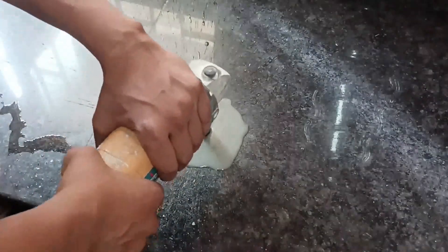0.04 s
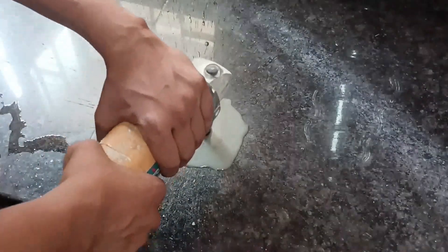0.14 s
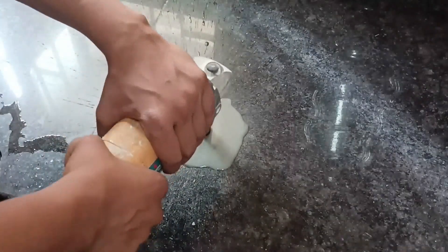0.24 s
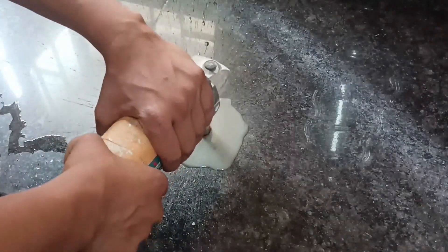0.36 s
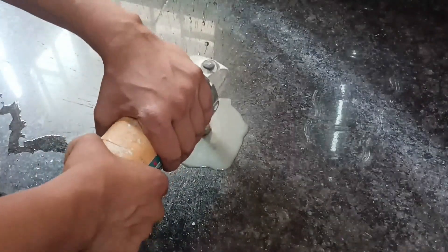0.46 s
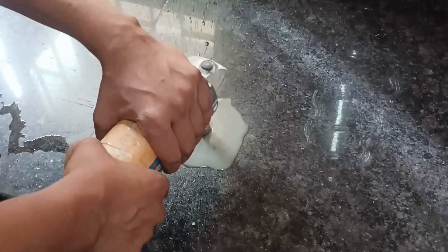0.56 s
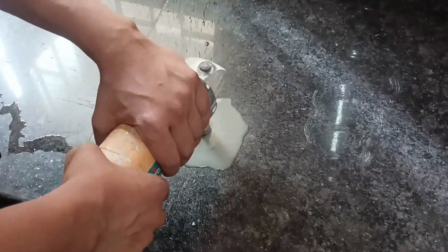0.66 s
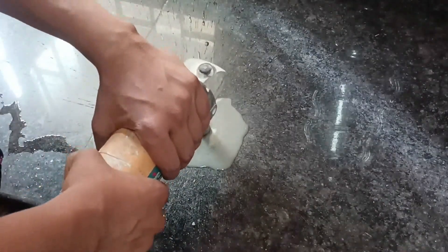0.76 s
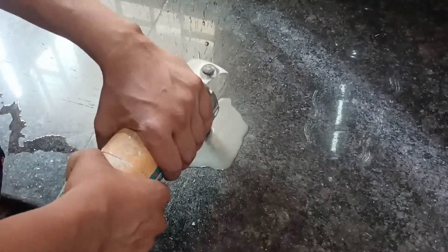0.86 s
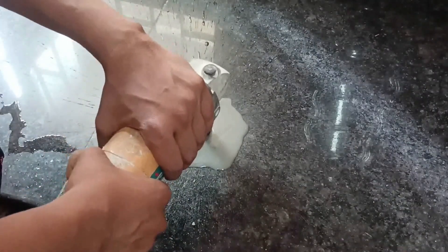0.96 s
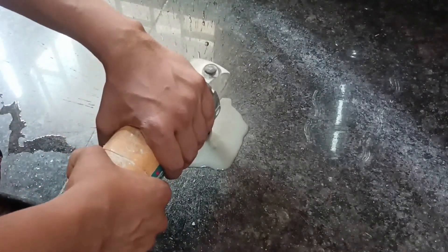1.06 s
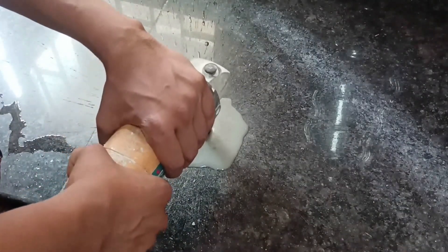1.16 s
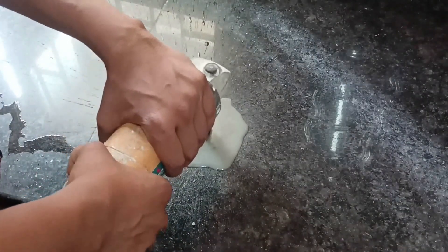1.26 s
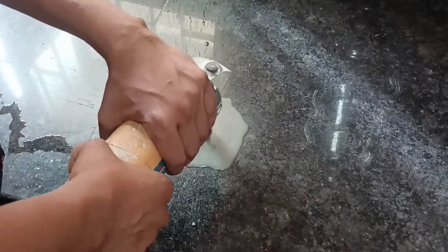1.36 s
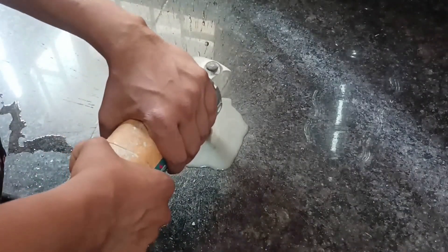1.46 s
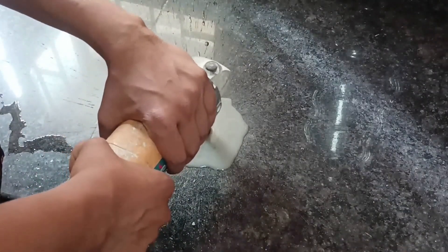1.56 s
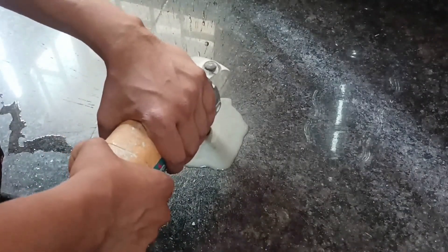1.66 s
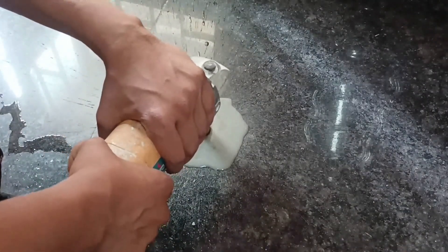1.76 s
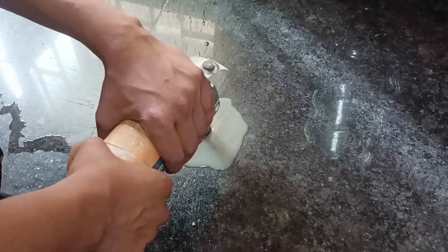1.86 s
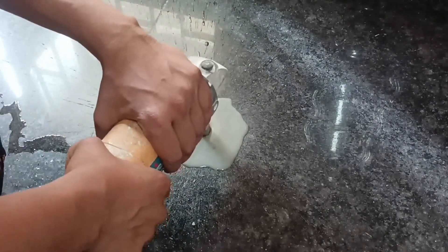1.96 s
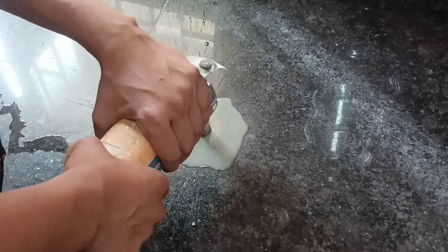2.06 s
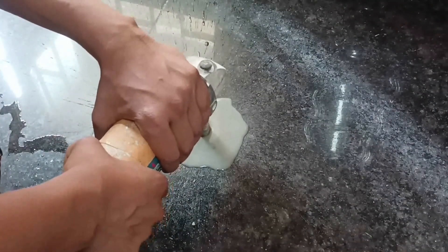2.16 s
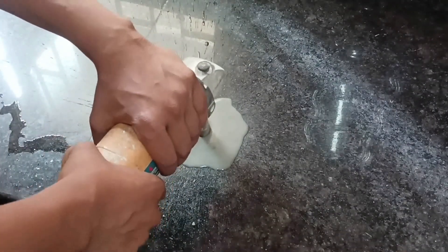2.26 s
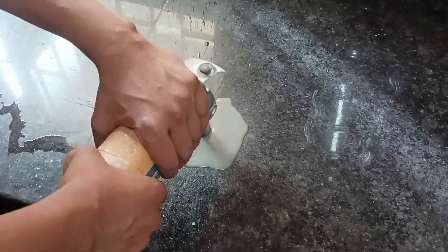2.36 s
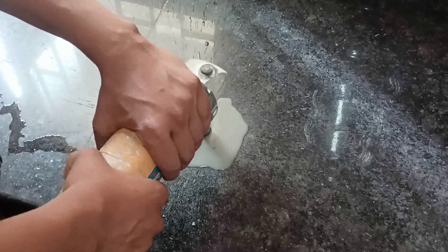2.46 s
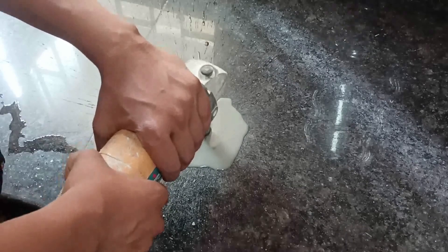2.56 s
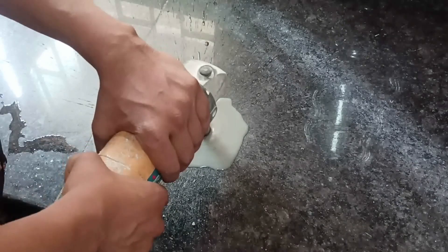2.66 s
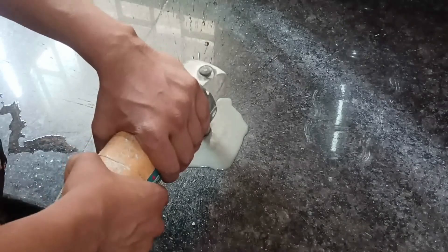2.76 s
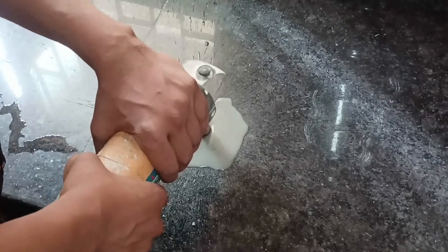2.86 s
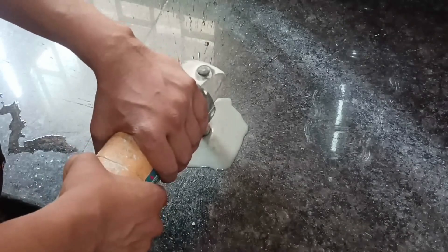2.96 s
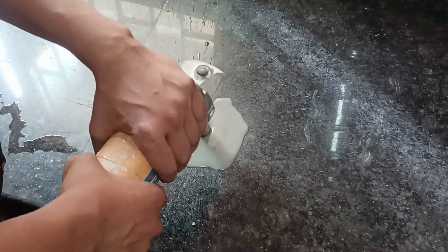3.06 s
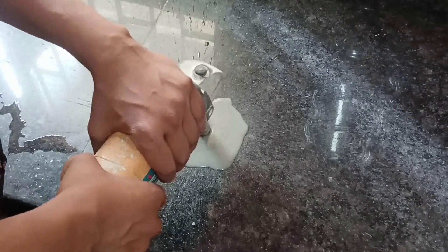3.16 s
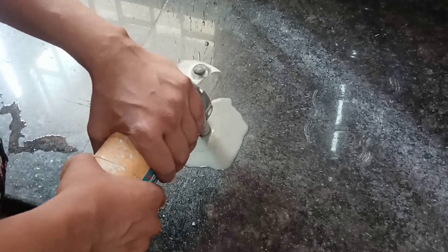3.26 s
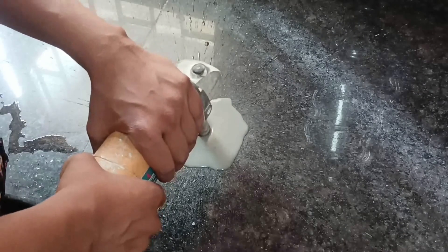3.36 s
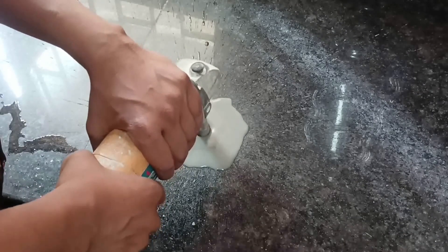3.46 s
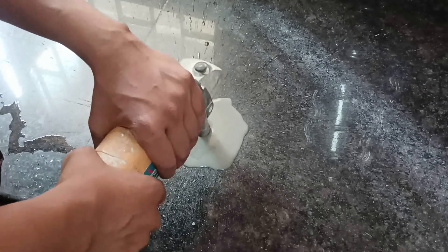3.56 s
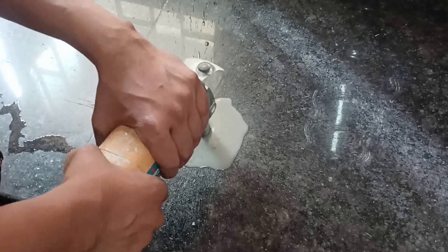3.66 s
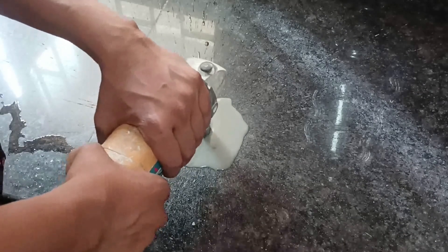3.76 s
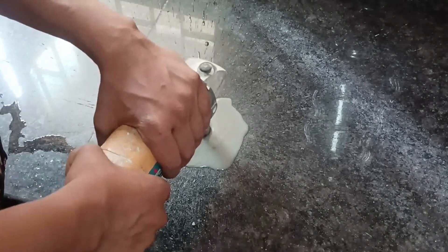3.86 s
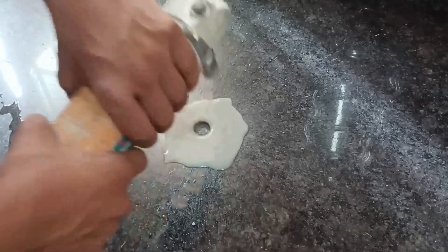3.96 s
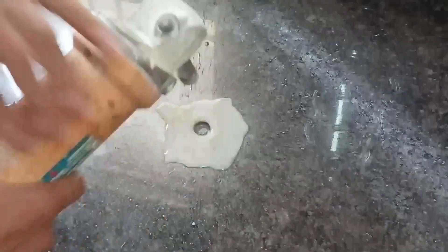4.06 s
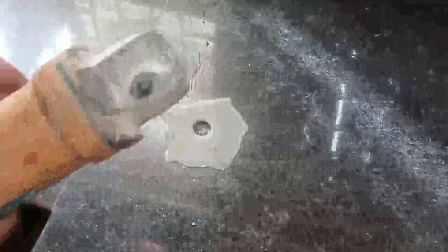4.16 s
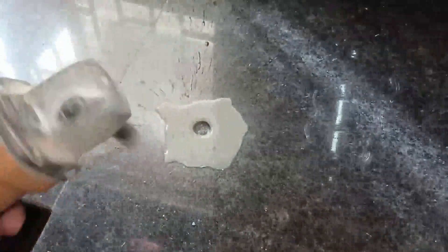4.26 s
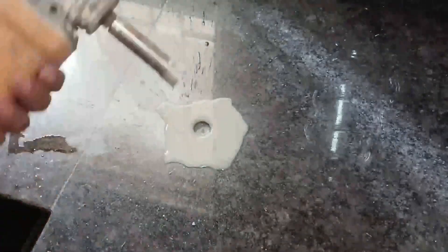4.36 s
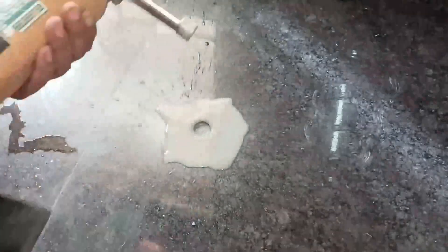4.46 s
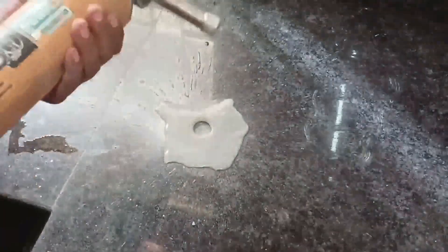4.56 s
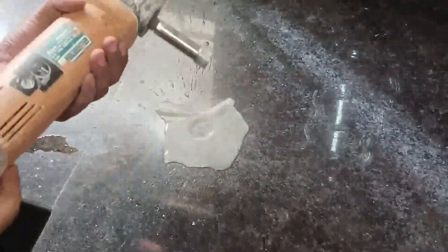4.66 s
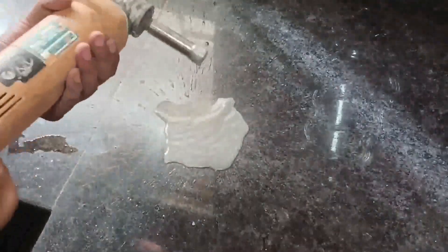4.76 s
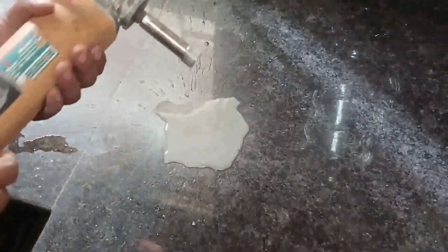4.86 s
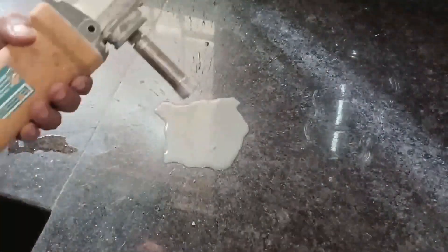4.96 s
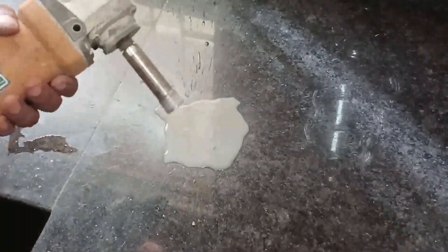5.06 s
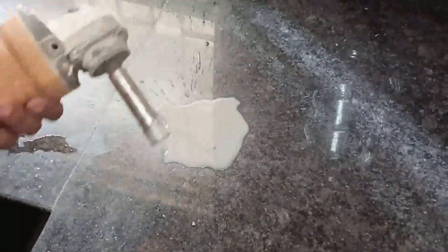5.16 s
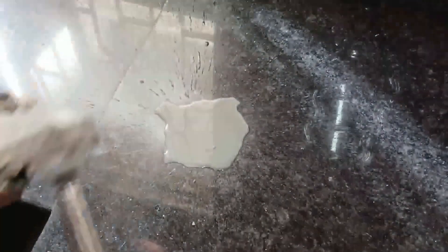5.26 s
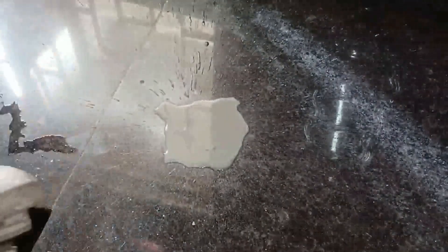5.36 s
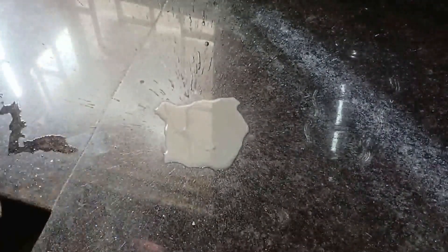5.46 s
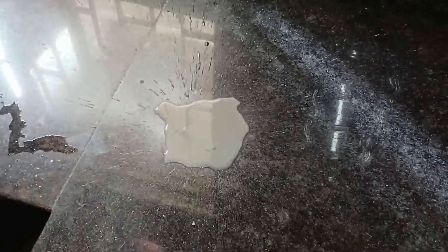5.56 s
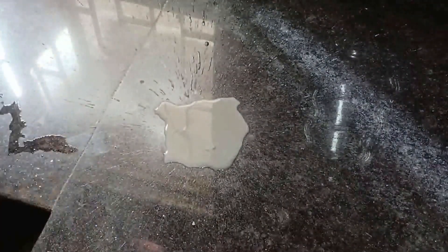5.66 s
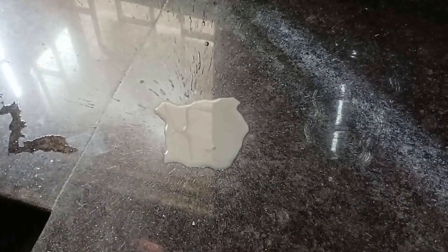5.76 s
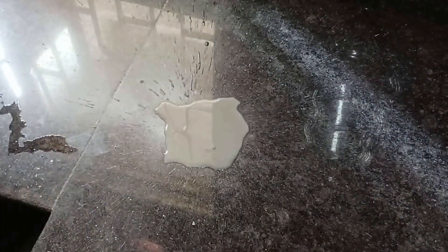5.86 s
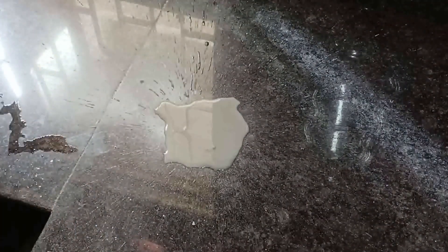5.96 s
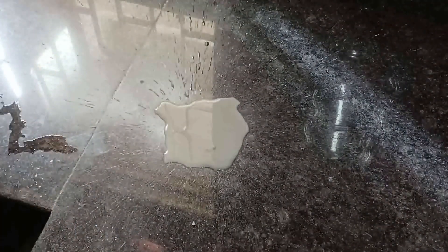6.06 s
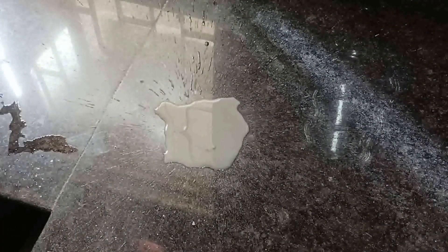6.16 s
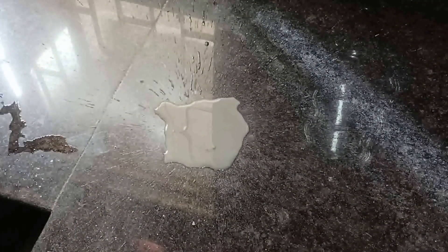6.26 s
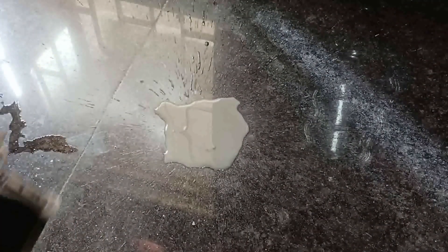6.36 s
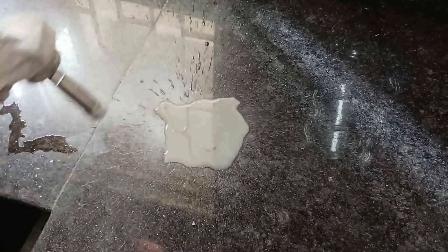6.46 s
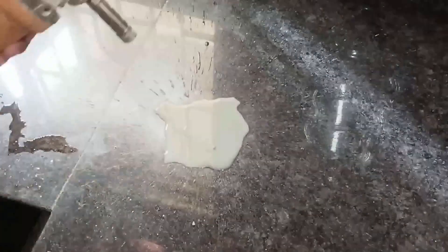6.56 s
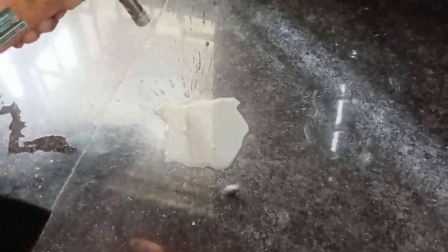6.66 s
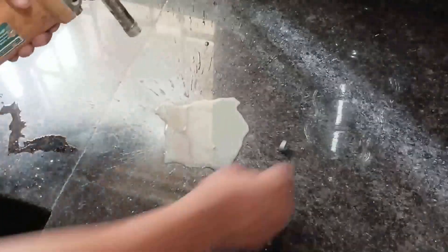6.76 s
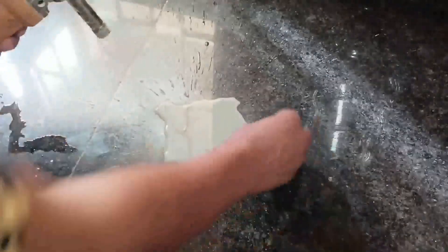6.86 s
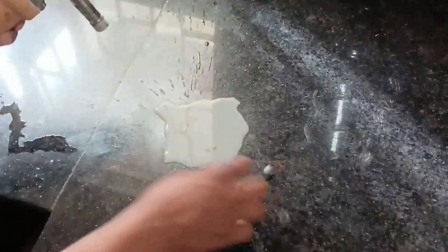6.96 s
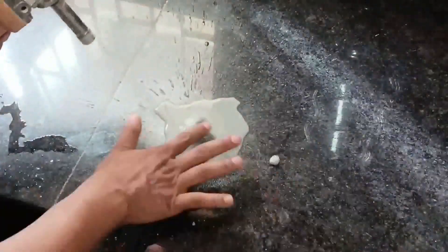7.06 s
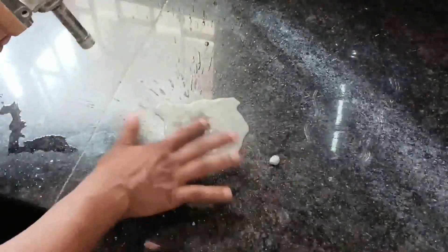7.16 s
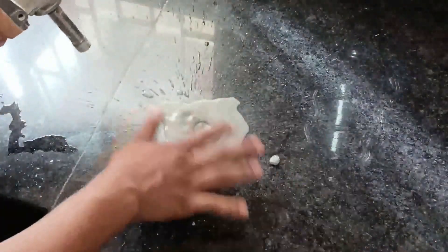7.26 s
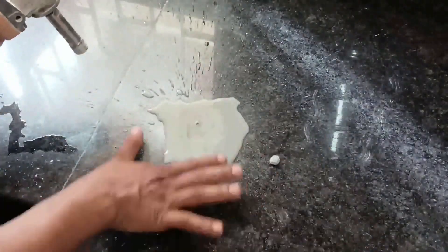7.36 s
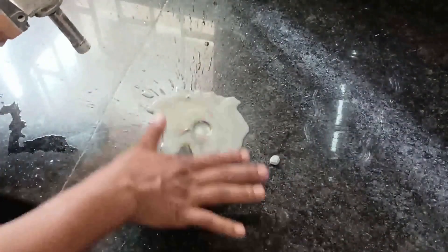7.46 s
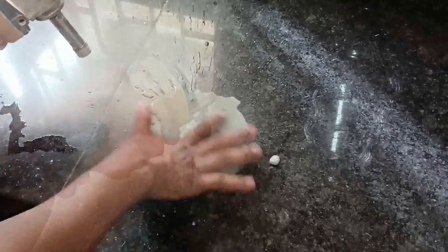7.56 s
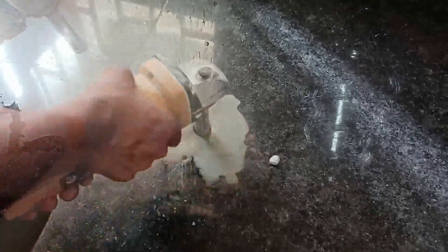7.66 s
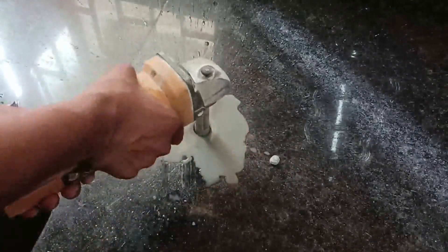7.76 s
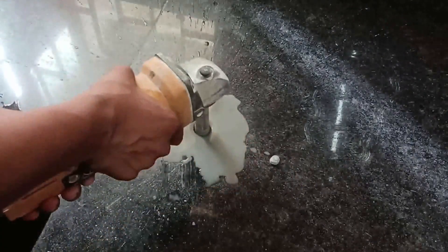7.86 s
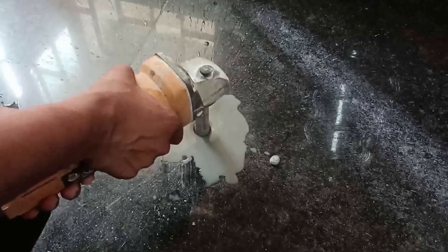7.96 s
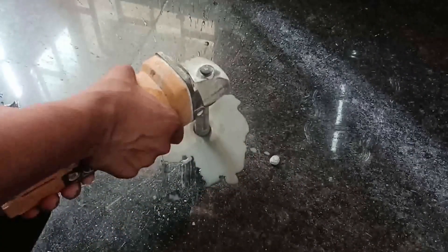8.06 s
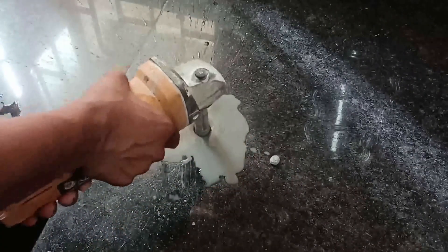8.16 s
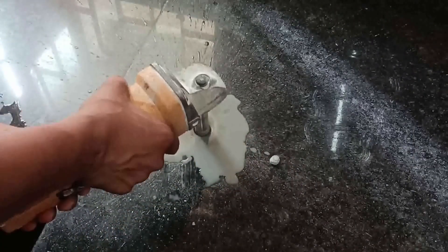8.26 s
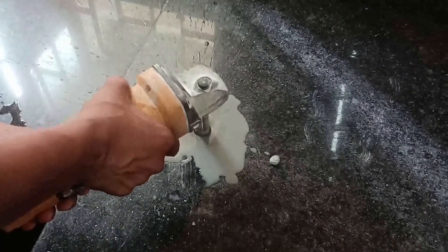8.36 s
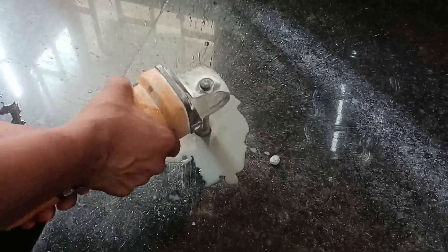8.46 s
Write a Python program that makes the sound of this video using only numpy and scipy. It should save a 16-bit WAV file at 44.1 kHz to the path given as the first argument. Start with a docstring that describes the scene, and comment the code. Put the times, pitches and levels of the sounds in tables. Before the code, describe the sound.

From 0 to 3.95 s an angle grinder cuts wet stone very close to the microphone: a loud, dense roar of fan air, gear rattle and gritty chipping, with a fluttering whine around 8 kHz, metallic ringing near 4.3 kHz, brief squeals and irregular low chatter as the bit catches. At about 4 s it lifts; the grinding drops away and the whine rises slightly in free running. Switched off near 4.7 s, it falls in pitch and loudness, gears clattering, stopping around 5.8 s with dull bench booms. Quiet background remains, with faint taps and wet chirps. Near 6.47 s a sharp, ringing steel-on-stone double knock sounds, then a small stone plug bounces lightly at 6.8-6.95 s. Soft gritty hand wipes follow at 7.05-7.5 s. At 7.6 s the motor starts abruptly and noise swells into bright, singing drilling, continuing to the end at 8.5 s.

```python
"""In a workshop, an angle grinder drives a diamond core bit through a wet stone slab, close to a phone.
Fan air, gear rattle and grit are shaped noise; whine and chatter are fluttering tones that follow the motor.
The tool is lifted, switched off and coasts to rest; taps, booms and knocks are short swells and fading rings.
The stone plug is knocked out and skips over the slab as fading tones, a hand wipes slurry as strokes of
coloured noise, and the next hole is started with the same machine sounds."""
import sys
import numpy as np
from scipy import signal
from scipy.fft import rfft, irfft
from scipy.io import wavfile
from scipy.ndimage import uniform_filter1d, map_coordinates

SR = 44100
rng = np.random.default_rng(int(sys.argv[2]) if len(sys.argv) > 2 else 0)


def generate_wav(sig):
    """Save sig (samples, or channels by samples) to the path in sys.argv[1] as 16-bit PCM at SR."""
    pcm = np.round(np.clip(np.atleast_2d(sig).T, -1, 1) * 32767).astype(np.int16)
    wavfile.write(sys.argv[1], SR, pcm)


N = 375291
T = np.arange(N) / SR  # time in seconds
FREQS = np.maximum(np.arange(N // 2 + 1) * SR / N, 1)  # in Hz, kept above zero for logarithms

# Resonances of the stone slab. Each row: pitch in Hz, width in Hz, relative level in dB.
SLAB_MODES = [(612, 240, 5.5), (1160, 340, -4), (1574, 850, -7), (2080, 410, -6), (2980, 350, -4.5),
              (3350, 250, -5), (5350, 670, -7), (6200, 590, -4), (7300, 1100, -8), (8500, 1500, -15),
              (10900, 3500, -18)]

LIFT_S, RELEASE_S = 3.95, 0.09  # the bit is lifted, and the time it takes to leave the stone
OFF_S, STOP_S, ON_S = 4.722, 5.812, 7.594  # switched off, at rest, switched on again
FREE_HZ = 8780  # whine pitch at full free speed
WHINE_ORDER = 50  # cycles of the whine in one turn of the spindle
STALL_SHARE = 0.15  # share of full speed near which the gears stop clattering


def undb(db):
    """Turn decibels into a gain."""
    return 10 ** (np.asarray(db) / 20)


def unit(x):
    """Scale to an rms of 1."""
    return x / np.sqrt(np.mean(x ** 2))


def over_time(points):
    """Join points of (seconds, value) with straight lines."""
    return np.interp(T, *np.transpose(points))


def gains(table):
    """Turn the dB columns of a timed table into gain curves that fade out beyond its ends."""
    s, *columns = np.transpose(table)
    gate = np.interp(T, [s[0] - .03, s[0], s[-1], s[-1] + 0.089], [0, 1, 1, 0])
    return [gate * undb(np.interp(T, s, c)) for c in columns]


def shape(points):
    """Frequency response through points of (Hz, dB)."""
    hz, db = np.transpose(points)
    return undb(np.interp(np.log(FREQS), np.log(hz), db))


def resonances(modes, at=FREQS):
    """Frequency response of steep-sided resonances, added up in power."""
    power = 0
    for hz, width, db in modes:
        detuning = (at / hz - hz / at) * hz / width
        power = power + (undb(db) / (1 + detuning ** 2)) ** 2
    return np.sqrt(power)


def colour(x, response, band=None):
    """Filter a noise so that its rms is about 1, overall or within a band in Hz."""
    inside = FREQS > 0 if band is None else (FREQS > band[0]) & (FREQS < band[1])
    return irfft(rfft(unit(x)) * response, N) / np.sqrt(np.mean(abs(response) ** 2 * inside))


def walk(rate):
    """Random levels held for 1 / rate seconds and smoothed twice; their spread is near 1."""
    k = int(SR / rate)
    steps = np.repeat(rng.standard_normal(N // k + 1), k)
    return 1.323 * uniform_filter1d(uniform_filter1d(steps, k), k)[:N]


def bump(middle, length):
    """A half-cosine hump around its middle, in seconds."""
    return np.cos(np.pi * np.clip((T - middle) / length, -.5, .5))


def grains(spread_db):
    """Dense tiny impacts at two ports: a shared part, later on the left, and separate scattered parts."""
    likeness, lag_s = 0.12, .00086  # share of power common to both ports, delay on the left
    bursts = np.repeat(rng.exponential(size=N // 8 + 1), 8)[:N].clip(0, 5.5)
    direct, left, right = rng.standard_normal((3, N)) * undb(spread_db * bursts)
    shared = np.array([np.roll(direct, int(lag_s * SR)), direct])
    return np.sqrt(likeness) * shared + np.sqrt(1 - likeness) * np.array([left, right])


def flecks(count, low_hz, high_hz, t60, spread_db):
    """Single grits catch the steel and set it ringing for a moment."""
    t = np.arange(SR // 8) / SR
    out = np.zeros((2, N + len(t)))
    envelope = (1 - np.exp(-t / 0.0071)) * np.exp(-np.log(1000) * t / t60)
    for when, pitch, size, left, right in rng.random((count, 5)):
        start = int(when * N)
        hz = low_hz * (high_hz / low_hz) ** pitch
        tone = np.sin(2 * np.pi * (hz * t + np.array([[left], [right]])))
        out[:, start:start + len(t)] += undb(spread_db * size) * envelope * tone
    return unit(out[:, :N])


def partial(phase, lead, rough, rate):
    """A tone whose strength and phase flutter, differently at each port; the right leads by some radians."""
    shared = 1 + 0.85 * rough * (walk(rate) + 1j * walk(rate))
    ports = []
    for late in (lead, 0):
        own = 0.66 * rough * (walk(rate) + 1j * walk(rate))
        ports.append((shared + own) * np.exp(1j * (phase - late)))
    return unit(np.real(ports))


def flicker(x, depth_db, size):
    """Narrow bands swell and fade on their own as contacts come and go."""
    _, _, z = signal.stft(x, nperseg=1024)
    field = uniform_filter1d(rng.standard_normal(z.shape[1:]), size, axis=0)
    field = uniform_filter1d(field, 4, axis=1)
    return signal.istft(z * unit(undb(depth_db * unit(field))), nperseg=1024)[1][:, :N]


def drift(x, share, rate):
    """Stretch and squeeze time a little, so that every pitch wanders by about this share of itself."""
    at = np.arange(N) + np.cumsum(share * walk(rate))
    return np.array([map_coordinates(port, [at], order=3, mode="mirror") for port in x])


def balance(points):
    """Left and right responses of equal total power, from points of left minus right in dB."""
    ratio = shape(points)
    return np.array([ratio, np.ones_like(ratio)]) * np.sqrt(2 / (1 + ratio ** 2))


def strike(s, rise, t60):
    """Envelope that swells to a blow and dies away."""
    return np.exp(np.minimum((T - s) / rise, -np.log(1000) * (T - s) / t60).clip(-40, 0))


def fading_tone(hz, t60, t):
    """One struck resonance: a sine that falls by 60 dB in t60 seconds, with its own phase at each port."""
    return np.sin(2 * np.pi * (hz * t + rng.random((2, 1)))) * np.exp(-np.log(1000) * t / t60)


def stages():
    """Weights of the three stages: in the first hole, lifted, in the second hole."""
    swell_s = 0.225  # the noise swells over this time in the second hole
    lifted = np.clip((T - LIFT_S) / RELEASE_S, 0, 1)
    second = 1 - np.exp(-(np.maximum(T - ON_S, 0) / swell_s) ** 2)
    return 1 - lifted, lifted * (T < ON_S), second


def motor_speed():
    """Whine pitch: held down by the cut, rising when lifted, coasting on drag and friction, restarting."""
    # Speed as the hand leans on the bit in each hole. Each row: time in seconds, whine pitch in Hz
    # (the second hole's pitch is the one reached once the motor has spun up).
    speed_first = [(0, 8130), (.3, 8240), (.52, 8170), (.65, 8320), (.85, 8280), (1.0, 8260), (1.3, 8400),
                   (1.48, 8190), (1.65, 8282), (1.92, 8360), (2.25, 8277), (2.75, 8134), (3.08, 8276),
                   (3.24, 8174), (3.38, 8286), (3.6, 8195), (3.8, 8190), (3.95, 8300)]
    speed_second = [(8.0, 8510), (8.12, 8500), (8.25, 8370), (8.5, 8230)]
    run_up_s, drag_s, spin_up_s = .14, 1.06, .04  # time constants of run-up, coast and restart
    sag = (FREE_HZ - over_time(speed_first)) * np.exp(-np.maximum(T - LIFT_S, 0) / run_up_s)
    friction = np.exp(-(STOP_S - OFF_S) / drag_s)
    coast = np.clip((np.exp(-(T - OFF_S) / drag_s) - friction) / (1 - friction), 0, 1)
    restart = over_time(speed_second) * (1 - np.exp(-np.maximum(T - ON_S, 0) / spin_up_s))
    return np.maximum((FREE_HZ - sag) * coast + restart, 1)


def spindle_turn(whine_hz):
    """Angle of the spindle in radians."""
    return 2 * np.pi * np.cumsum(whine_hz / WHINE_ORDER) / SR


def grinder():
    """One shaft speed drives most layers; the left-right balance shifts as the tool is moved."""
    # Balance in the first hole, lifted, and in the second hole. Each row: pitch in Hz, left minus right in dB.
    pan_down = [(60, 6.5), (110, -4), (200, 3.5), (380, -3.5), (700, 4), (1290, 15.5), (2380, 4), (4400, 1),
                (8120, 4.5), (15000, -3)]
    pan_lifted = [(60, 0.5), (110, 0), (200, 5), (380, 1.5), (700, 9), (1290, 11), (2380, 7.5), (4400, 2.5),
                  (8120, 5), (15000, -2)]
    pan_second = [(60, 3), (110, -7), (200, 3), (380, -2.5), (700, 7.5), (1290, 11), (2380, 3.5),
                  (4400, -1.5), (8120, 5), (15000, -3)]
    whine_hz = motor_speed()
    noise = flicker(machine(whine_hz) + grinding(whine_hz), depth_db=1.9, size=3)
    tones = chatter(whine_hz / WHINE_ORDER) + whine(whine_hz) + squeals()
    tool = rfft(noise + tones + shallow_singing())
    lifted = np.interp(T, [3.9, 4.15], [0, 1])
    second = np.interp(T, [STOP_S, ON_S], [0, 1])
    poses = [(1 - lifted, pan_down), (lifted - second, pan_lifted), (second, pan_second)]
    return sum(weight * irfft(tool * balance(pan), N) for weight, pan in poses)


def loudness(noise, whine_hz):
    """Gain of one machine noise: steady in each hole, falling with speed while the motor coasts."""
    first_db, lifted_db, second_db, fall_db, stall_db = noise
    pass_s, pass_width_s, pass_db = 4.32, 0.2, 1.5  # the lifted tool swings past the phone
    stall_spread, rest_share = 0.081, 0.036  # below the rest share of full speed everything dies away
    first, lifted, second = stages()
    speed = whine_hz / FREE_HZ
    near_db = pass_db * np.exp(-((T - pass_s) / pass_width_s) ** 2)
    stalling = (1 - np.tanh((speed - STALL_SHARE) / stall_spread)) / 2
    coasting = undb(fall_db * np.log10(speed) + stall_db * stalling) * np.minimum(speed / rest_share, 1)
    coasting = uniform_filter1d(coasting * (T < ON_S), size=SR // 16)
    return first * undb(first_db) + lifted * undb(lifted_db + near_db) * coasting + second * undb(second_db)


def machine(whine_hz):
    """The fan rushes, gear teeth rattle, and both ring the gear case and the steel tube."""
    # Levels of the four noises. Columns: dB in the first hole, dB lifted, dB in the second hole,
    # dB lost per tenfold fall in speed, dB change near the stall.
    fan = (-30.5, -30, -30, 39.5, 1)
    teeth = (-33.5, -29, -30.5, 3, -12.5)
    tube_level = (-30, -35, -30, 12, -21)
    case_level = (-30, -29, -30.5, 10, -22)
    # Spectra of fan air and gear teeth. Each row: pitch in Hz, relative level in dB per Hz.
    air_spectrum = [(30, -27), (150, -26.5), (380, -20.5), (560, -8.5), (900, -5.5), (1500, 1),
                    (3000, -2.5), (3800, 0.5), (5400, 1), (6100, -1), (7300, 1.5), (7750, -3), (8700, -6.5),
                    (9400, -21), (13500, -22.5), (15200, -18)]
    gear_spectrum = [(120, -64.5), (200, -33), (435, -30), (602, -15.5), (1150, -9), (1410, -0.5),
                     (1780, -5.5), (2900, -1.5), (3730, -7), (4390, -7.5), (5860, -20), (7150, -12),
                     (9550, -32.5), (13500, -39), (15000, -25.5)]
    # Resonances of the air vents, the tube in its hole, the tube out of its hole, and the gear case.
    # Each row: pitch in Hz, width in Hz, relative level in dB.
    vent_modes = [(3200, 220, -9.5), (4980, 170, -7.5), (5640, 260, -8.5), (6050, 230, -7),
                  (6480, 200, -10)]
    tube_modes = [(7110, 420, 8.5), (6980, 55, 8), (6500, 240, -0.5), (8240, 92, -3.5)]
    free_tube_modes = [(7220, 84, 4), (7000, 60, -9), (8190, 150, -9), (8800, 310, -22.5), (2910, 170, 0.5),
                       (3260, 200, -2), (4480, 130, -2.5), (1415, 130, -0.5)]
    case_modes = [(4140, 440, 4), (4300, 30, 7), (4385, 100, 3.5), (4520, 130, 5.5), (4935, 90, 1.5),
                  (5360, 110, -5), (1400, 360, -8.5), (3207, 180, 0)]
    # Swell of the gear case's ring. Each row: time in seconds, change in dB.
    case_swell = [(0, -5), (.3, -0.5), (.45, 2.5), (.7, 2), (.95, -1.5), (1.08, -7.5), (1.35, -7.5),
                  (1.5, -2), (1.9, 1), (2.1, 2.5), (2.45, 2), (2.7, -4), (3.1, -1), (3.35, 2), (3.5, -0.5),
                  (3.8, 1), (4.05, -0.5), (4.3, 0), (4.55, -4), (4.8, 0.5), (4.95, -1.5), (8.5, -1)]

    speed = whine_hz / FREE_HZ
    air = loudness(fan, whine_hz)
    rush = colour(grains(spread_db=1.5), shape(air_spectrum) * (1 + resonances(vent_modes)), band=(5600, 6500))
    out = air * rush * undb(0.73 * walk(90))
    out += undb(-6.5) * air * flecks(count=700, low_hz=2218, high_hz=7480, t60=0.038, spread_db=14.0)

    # As the motor slows, the slack gears clatter once per turn.
    backlash_db = 0.5 * (1 - speed) * np.sin(spindle_turn(whine_hz) + walk(40))
    rattle = colour(grains(spread_db=2.5), shape(gear_spectrum), band=(2300, 3700))
    out += loudness(teeth, whine_hz) * rattle * undb(backlash_db + 0.38 * walk(70))

    tube_ring = colour(grains(spread_db=2.0), resonances(tube_modes), band=(6950, 7350))
    out += loudness(tube_level, whine_hz) * tube_ring * undb(0.84 * walk(25))
    # In the open air the tube loses 8.5 dB per tenfold fall in speed, and more near the stall.
    free_level = stages()[1] * undb(-34 + 8.5 * np.log10(speed)) * np.minimum(speed / STALL_SHARE, 1)
    free_ring = colour(grains(spread_db=2.5), resonances(free_tube_modes))
    out += free_level * free_ring * undb(2 * walk(23))

    case_ring = colour(grains(spread_db=2.0), resonances(case_modes), band=(4200, 4600))
    flashes = undb(-8) * flecks(count=600, low_hz=4100, high_hz=4650, t60=0.1, spread_db=11)
    case_gain = loudness(case_level, whine_hz) * undb(over_time(case_swell))
    return out + case_gain * (case_ring * undb(-3 + 0.81 * walk(22)) + flashes)


def grinding(whine_hz):
    """Diamonds chip the stone, biting once a turn and harder as the motor sags; the rim's ring wanders in pitch."""
    # Spectrum of the chips. Each row: pitch in Hz, relative level in dB per Hz.
    chip_spectrum = [(100, -31.5), (250, -21.5), (420, -18), (700, -10), (1100, -6), (1330, -9), (1750, 1),
                     (2100, -5.5), (2700, -13), (6000, -28), (10000, -32.5), (15000, -27.5)]
    # Low, middle and high resonances of the rim. Each row: pitch in Hz, width in Hz, relative level in dB.
    rim_low = [(1316, 120, 0), (1450, 90, 0.0037)]
    rim_middle = [(1634, 230, -1), (1764, 100, 0), (1836, 39, -1)]
    rim_high = [(1990, 190, -0.5), (2300, 290, -3.5)]
    # Ring of the rim in the first hole. Each row: time in seconds, then low, middle and high relative level in dB.
    rim_levels = [(0.0, -30, -31.5, -27), (0.03, -32.5, -28.5, -37.5), (0.09, -32, -23.5, -32.5),
                  (0.27, -35.5, -31, -33), (0.92, -31.5, -28, -34), (1.17, -33.5, -27.5, -44),
                  (1.23, -35, -30, -40), (1.5, -36, -29, -36.5), (1.72, -32.5, -33, -36.5),
                  (1.79, -24.5, -30, -29.5), (1.85, -29, -32, -39.5), (2.13, -33.5, -28, -26.5),
                  (2.22, -32.5, -40, -36), (2.67, -32.5, -28, -33), (2.75, -24.5, -25.5, -27),
                  (2.8, -34, -36, -31.5), (2.89, -31.5, -29, -30), (3.42, -32.5, -33, -30.5),
                  (3.44, -34, -30.5, -24.5), (3.51, -30.5, -23, -31.5), (3.57, -34.5, -27, -29.5),
                  (3.64, -32, -30, -30.5), (3.85, -38.5, -29, -27), (3.95, -33.5, -32.5, -27)]
    # Extra gain in dB of the low, middle and high group.
    rim_gain_db = (-0.5, 0.5, -0.5)
    cut_first_db, cut_second_db = -29.5, -36.5  # cutting strength in each hole at the usual sag
    usual_sag_hz, cut_power = 528, 0.93  # cutting grows as this power of the sag

    first, _, second = stages()
    load = np.clip((FREE_HZ - whine_hz) / usual_sag_hz, .01, 1.15) ** cut_power
    feed = load * (first * undb(cut_first_db) + second * undb(cut_second_db)) * undb(0.34 * walk(8.9))
    bite = undb(1.0 * np.sin(spindle_turn(whine_hz) + walk(40)) + 0.79 * walk(60))  # 1 dB once a turn
    chips = undb(-3.0) * colour(grains(spread_db=2.0), shape(chip_spectrum), band=(1550, 2100))
    rim = 0
    for gain, db, modes in zip(gains(rim_levels), rim_gain_db, (rim_low, rim_middle, rim_high)):
        rim = rim + gain * undb(db) * colour(grains(spread_db=2.5), resonances(modes))
    grits = undb(-7.0) * flecks(count=800, low_hz=1256, high_hz=2153, t60=0.15, spread_db=8)
    return feed * grits + bite * (feed * chips + drift(rim, share=.012, rate=9))


def chatter(spindle_hz):
    """The bit rattles in its hole near multiples of the spindle rate; some catch as firm notes with a rumble."""
    # Firm fits of chatter. Each row: start in seconds, length in seconds, multiple of the spindle rate,
    # relative level in dB.
    chatter_fits = [(0, 0.03, 2, -26), (0.115, 0.068, 2, -29.5), (0.197, 0.036, 2, -31.5),
                    (0.311, 0.028, 2, -35.5), (0.383, 0.029, 2, -28.5), (0.43, 0.066, 2, -29.5),
                    (0.515, 0.028, 2, -38), (0.564, 0.032, 6, -28.5), (0.689, 0.077, 3, -29.5),
                    (0.792, 0.21, 1, -43.5), (0.816, 0.035, 2, -35.5), (0.86, 0.12, 3, -32),
                    (0.933, 0.021, 2, -38), (0.922, 0.08, 6, -33), (1.1, 0.031, 3, -45.5),
                    (1.252, .035, 3, -36.5), (1.338, 0.04, 2, -34), (1.324, 0.031, 6, -30),
                    (1.408, 0.038, 6, -25), (1.437, 0.08, 2, -29), (1.448, 0.037, 3, -30),
                    (1.516, 0.044, 6, -26.5), (1.546, 0.069, 3, -28.5), (1.59, 0.034, 2, -31),
                    (1.647, 0.057, 2, -38), (1.67, 0.027, 6, -29.5), (1.673, 0.14, 3, -32),
                    (1.824, 0.031, 3, -28.5), (1.82, .045, 6, -28), (1.87, 0.092, 4, -29), (2, .03, 2, -41),
                    (2.012, 0.033, 3, -34.5), (2.065, .04, 6, -28.5), (2.086, 0.073, 3, -28.5),
                    (2.123, 0.027, 6, -20.5), (2.124, 0.044, 2, -32), (2.186, 0.051, 3, -25.5),
                    (2.275, 0.039, 6, -28), (2.292, 0.05, 2, -31.5), (2.346, 0.063, 2, -24),
                    (2.33, .03, 3, -32), (2.395, 0.04, 3, -34), (2.481, 0.11, 2, -28),
                    (2.487, .045, 3, -29.5), (2.622, 0.063, 6, -30), (2.669, 0.083, 2, -26.5),
                    (2.78, 0.051, 2, -30), (2.83, 0.19, 3, -34), (2.849, 0.13, 6, -24.5),
                    (2.87, 0.048, 4, -30.5), (2.88, 0.089, 1, -46), (2.931, 0.021, 2, -33),
                    (3.04, 0.024, 3, -40), (3.08, 0.025, 3, -30), (3.138, 0.033, 6, -20.5),
                    (3.125, .05, 2, -36.5), (3.152, .11, 3, -33.5), (3.21, 0.048, 2, -37),
                    (3.294, 0.1, 3, -34), (3.345, 0.033, 6, -27.5), (3.36, 0.036, 2, -31),
                    (3.447, 0.16, 2, -32.5), (3.605, 0.16, 2, -27.5), (3.763, 0.071, 2, -24.5),
                    (3.661, 0.071, 3, -29.5), (3.75, 0.12, 3, -40), (3.886, 0.048, 2, -29.5),
                    (3.93, 0.022, 6, -32.5), (7.708, 0.027, 6, -37), (7.731, 0.056, 2, -39),
                    (7.812, 0.045, 2, -36.5), (7.912, 0.046, 3, -31.5), (7.977, 0.034, 6, -29),
                    (8.005, 0.11, 3, -39.5), (8.191, 0.096, 2, -31), (8.201, 0.066, 3, -27.5),
                    (8.285, 0.089, 2, -35), (8.355, 0.034, 3, -38), (8.463, .04, 4, -34.5)]
    # Light chatter between the fits. Each row: multiple of the spindle rate, usual pitch in Hz, relative level in dB.
    light_chatter = [(1, 167, -54.5), (2, 331, -45.5), (3, 501, -42.5), (4, 676, -43), (5, 832, -42),
                     (6, 1005, -38.5)]
    # Spectrum of the rumble. Each row: pitch in Hz, relative level in dB per Hz.
    rumble_spectrum = [(60, -25.5), (130, -9), (230, -8.5), (420, 0), (800, 2), (1500, -20), (5000, -49.5)]
    usual_spindle_hz, follow = 165.3, .5  # pitch follows the spindle loosely, as this power of its speed
    catch_s = 0.024  # a fit builds up and dies over this time
    firm_db, rumble_db = -1, -15  # note and rumble against the level of the fit

    speed = (spindle_hz / usual_spindle_hz) ** follow * (1 + 0.011 * walk(35))
    first, _, second = stages()
    contact = (first + undb(-2.0) * second) * unit(undb(3 * walk(12)))
    out, grip = 0, 0
    for order, hz, light_db in light_chatter:
        fits = 0
        for s, length, multiple, db in chatter_fits:
            if multiple == order:
                inside_s = np.minimum(T - s, s + length - T)
                fits = fits + undb(db) * np.clip(.5 + inside_s / catch_s, 0, 1)
        light = contact * undb(light_db) * unit(undb(5.1 * walk(45)))
        phase = 2 * np.pi * np.cumsum(hz * speed) / SR
        lead = 1.88 * min(order / 2, 1)  # radians by which it reaches the right port first
        out = out + undb(firm_db) * fits * partial(phase, lead, rough=.26 + .08 * order, rate=130)
        out = out + light * partial(phase, lead, rough=.9, rate=105)
        grip = grip + fits ** 2
    rumble = colour(grains(spread_db=2.0), shape(rumble_spectrum))
    return out + undb(rumble_db) * np.sqrt(grip) * undb(2.1 * walk(80)) * rumble


def whine(whine_hz):
    """The driven motor whines, louder at resonances of the steel; its octave shows only there, while lifted."""
    # Steel resonances the whine sweeps through. Each row: pitch in Hz, width in Hz, dB against the plain whine.
    whine_rings = [(5220, 150, 13), (5600, 120, 7), (6340, 140, 6), (8282, 110, 1), (12900, 500, -8.5)]
    # Surges of the whine. Each row: middle in seconds, length in seconds, dB over its usual level.
    whine_surges = [(.25, .08, 7), (.4, .06, 6.5), (0.678, 0.1, 9), (0.749, 0.045, 6), (.96, 0.098, 6),
                    (1.03, 0.11, 5.5), (1.107, 0.093, 6.5), (1.19, 0.063, 9.5), (1.3, 0.1, 7.5),
                    (1.58, 0.083, 6), (1.667, 0.076, 5.5), (1.89, 0.099, 8), (2.12, 0.069, 3),
                    (2.242, 0.049, 11), (2.37, .05, 3.5), (2.48, .07, 8), (3.11, 0.072, 9),
                    (3.346, 0.058, 8.5), (3.414, .07, 7.5), (3.564, 0.22, 6.5), (3.96, 0.043, 10),
                    (8.0, 0.17, 7), (8.3, .14, 2)]
    phase = 2 * np.pi * np.cumsum(whine_hz * (1 + 0.0004 * walk(30))) / SR
    power_on = np.interp(T, [OFF_S, OFF_S + RELEASE_S, STOP_S, ON_S], [1, 0, 0, 1])
    powered = sum(stages()) * power_on * (whine_hz / FREE_HZ) ** 2
    tone = undb(-44.5) * powered * (1 + resonances(whine_rings, whine_hz))
    tone = tone * partial(phase, lead=.3, rough=0.49, rate=80)
    octave = undb(-45) * stages()[1] * resonances(whine_rings, 2 * whine_hz)
    octave = octave * partial(2 * phase, lead=0.82, rough=.9, rate=200)
    surge_db = sum(db * bump(s, length) for s, length, db in whine_surges)
    pan_db = np.array([[-6.75], [6.75]])  # stronger on the right
    return (tone + octave) * undb(surge_db + 1.5 * walk(28) + pan_db)


def workshop():
    """A faint, restless background of shaped noise."""
    # Spectrum of the background. Each row: pitch in Hz, relative level in dB per Hz.
    shop_spectrum = [(18, -34.5), (30, -17.5), (92, -2.5), (296, -5.5), (460, -10.5), (612, -7),
                     (1730, -7.5), (2430, -9.5), (4420, -11.5), (13500, -39.5), (15000, -26.5)]
    # Level of the background. Each row: time in seconds, relative level in dB.
    shop_level = [(0, -2), (5.82, 4), (5.95, 1), (6.05, -.5), (6.23, 1), (6.4, -2), (6.9, -2), (7.1, -7.5),
                  (7.35, -9), (8.5, -2)]
    hiss = flicker(rng.standard_normal((2, N)), depth_db=2.6, size=5)
    return undb(-66.5 + 1.2 * walk(11)) * gains(shop_level)[0] * colour(hiss, shape(shop_spectrum))


def squeals():
    """Now and then the wall of the hole rubs the steel into a brief, nearly pure squeal."""
    # Each row: middle in seconds, length in seconds, pitch in Hz, level in dB before the flutter.
    squeal_list = [(.47, .07, 4260, -31.5), (.59, .06, 4270, -31), (.77, .05, 4325, -36),
                   (1.08, .07, 4005, -31.5), (2.05, .07, 4580, -31), (2.32, .06, 4900, -33),
                   (2.42, 0.063, 4300, -27.5), (2.66, 0.074, 4300, -26.5), (3.02, .06, 4300, -28.5),
                   (3.13, 0.071, 4320, -29), (3.24, 0.082, 4530, -30), (3.36, 0.091, 4320, -27.5),
                   (3.48, 0.063, 4350, -30), (3.98, .08, 4390, -32), (4.27, .06, 4370, -28),
                   (4.79, .1, 4480, -29), (7.98, 0.046, 4600, -28), (8.18, 0.073, 4420, -25),
                   (8.31, 0.068, 4380, -24.5), (8.42, .12, 4340, -30)]
    out = np.zeros((2, N))
    wobble = np.array([walk(90), walk(90)]) + 1j * np.array([walk(90), walk(90)])
    flutter = 1 + .25 * wobble
    for s, length, hz, db in squeal_list:
        near = abs(T - s) < length / 2
        swell = undb(db) * np.cos(np.pi * (T[near] - s) / length)
        out[:, near] += swell * np.real(flutter[:, near] * np.exp(2j * np.pi * hz * T[near]))
    return out


def handling():
    """Short squeaks and wet chirps are wavering tones, the bench booms dully, and light taps ring the slab."""
    # Squeaks, rings and chirps. Each row: start in seconds, relative level in dB, pitch in Hz,
    # seconds to fade by 60 dB, width in Hz.
    chirps = [(4.233, -29, 890, 0.15, 22), (4.43, -40, 567, 0.28, 22), (5.798, -44, 6830, 0.046, 70.6),
              (6.052, -55.5, 1395, 0.037, 90), (6.09, -61, 3300, 0.24, 220), (6.198, -54, 1380, .04, 90),
              (6.254, -67, 514, 0.14, 40), (6.615, -67, 2800, 0.17, 251), (6.66, -63, 1244, .12, 252),
              (6.68, -68, 564, .12, 80), (6.774, -58, 5620, .08, 149), (6.86, -60, 2890, 0.16, 250),
              (6.965, -56, 1160, 0.065, 90), (7.05, -72, 890, 0.18, 151), (7.114, -62, 5630, 0.084, 109.5),
              (7.12, -71, 4520, 0.17, 140.4), (7.46, -64, 4060, 0.11, 332), (7.495, -62, 607, 0.16, 30)]
    # Booms of the bench under the hands. Each row: middle in seconds, relative level in dB,
    # length in seconds, pitch in Hz.
    booms = [(5.741, -40, 0.012, 270), (5.754, -48, 0.09, 135), (5.79, -55, 0.19, 225),
             (5.803, -36, 0.063, 124.8), (5.84, -54, .08, 140), (6.266, -66, 0.18, 98),
             (6.38, -64, .16, 98), (6.507, -49, 0.078, 240), (6.95, -65, .16, 95), (7.41, -52, 0.19, 96),
             (7.584, -53, 0.13, 98)]
    # Taps of tool and stone plug. Each row: time in seconds, relative level in dB, rise in seconds,
    # seconds to fade by 60 dB, centre in Hz, width in octaves.
    taps = [(5.86, -61, 0.05, 0.22, 2920, 0.45), (6.073, -53, 0.0019, 0.11, 3600, 0.6),
            (6.159, -52, .0006, 0.025, 7000, 1.3), (6.1, -64, 0.028, 0.42, 1550, 0.23),
            (6.201, -64, .001, .04, 1500, 0.29), (6.27, -60.5, 0.034, 0.26, 3050, 0.34),
            (6.672, -52.5, 0.011, .19, 5460, 1.7), (6.781, -55.5, 0.011, 0.069, 5100, 0.6),
            (6.824, -55.5, .003, 0.2, 2200, 3.2), (6.954, -52.5, 0.0066, 0.075, 1600, 0.94),
            (6.997, -62, 0.0018, .04, 6470, .6), (7.13, -78, .01, 0.2, 3800, .8),
            (7.254, -65, .001, .03, 7000, .5), (7.38, -84, .03, .25, 4220, .6),
            (7.608, -59, 0.0066, 0.12, 4500, 1.2)]
    out = np.zeros((2, N))
    t = np.arange(SR // 4) / SR
    for s, db, hz, t60, width in chirps:
        steps = np.cumsum(rng.standard_normal(len(t) // 64 + 1)).repeat(64)[:len(t)]
        phase = 2 * np.pi * hz * t + steps * np.sqrt(2 * np.pi * width * 64 / SR)
        band = signal.butter(2, [hz - width, hz + width], "band", fs=SR, output="sos")
        tone = signal.sosfilt(band, np.sin(phase))
        envelope = (1 - np.exp(-t / .006)) * np.exp(-np.log(1000) * t / t60)
        start = int(s * SR)
        out[:, start:start + len(t)] += undb(db + 10.0) * tone * envelope
    for s, db, length, hz in booms:
        out += undb(db - 2.5) * bump(s, length) ** 2 * np.sin(2 * np.pi * hz * T + 0.92 * walk(55))
    grit = grains(spread_db=1.5)
    slab = resonances(SLAB_MODES) + undb(-6) / (1 + FREQS / 5000)  # ringing modes over a broad tick
    for s, db, rise, t60, hz, octaves in taps:
        focus = 1 / (1 + (np.log2(FREQS / hz) / octaves) ** 2)
        out += undb(db + 1.5) * strike(s, rise, t60) * colour(grit, slab * focus)
    return out


def knocks():
    """Each blow is a crack of steel on stone and the ring of the bit, stronger on the left."""
    # Each row: time in seconds, relative level in dB, rise in seconds, seconds to fade by 60 dB,
    # ring against the crack in dB.
    blows = [(6.453, -44.5, 0.0025, 0.058, -2), (6.478, -24, 0.0045, 0.15, 1)]
    # Ring of the struck bit. Each row: pitch in Hz, relative level in dB, seconds to fade by 60 dB.
    bit_modes = [(199.6, -12, 0.16), (280, -26, 0.24), (830, -16, 0.14), (1800, -10, 0.1),
                 (2180, -17, 0.13), (3230, -6.5, 0.085), (3830, -14, 0.15), (5150, -18, 0.11),
                 (5730, 4, 0.12), (6780, -21, 0.1), (7700, -1, 0.099), (7919, -8, 0.1), (8400, 1, 0.1),
                 (8650, 0, 0.068), (10850, -5, 0.085), (11900, -20, 0.14)]
    # Spectrum of the crack. Each row: pitch in Hz, relative level in dB per Hz.
    crack_spectrum = [(59, -57), (100, -36), (196, -7), (438, -21), (758, -10), (2810, -17), (3690, -8.5),
                      (4960, -9), (5750, -1.5), (8580, -13), (10200, -18), (11100, -16), (13100, -25),
                      (13900, -21.5), (15500, -7.5)]
    body = resonances([(hz, 210, 0) for hz, _, _ in bit_modes]) + 0.78 * resonances(SLAB_MODES) + 0.68
    crack = colour(grains(spread_db=2.0), shape(crack_spectrum) * body)
    out = np.zeros((2, N))
    t = np.arange(SR // 2) / SR
    for s, db, rise, t60, ring_db in blows:
        out += undb(db) * strike(s, rise, t60) * crack
        ring = sum(undb(g) * fading_tone(hz, fade_s, t) for hz, g, fade_s in bit_modes)
        start = int(s * SR)
        out[:, start:start + len(t)] += undb(db + ring_db) * ring * (1 - np.exp(-t / 0.0057))
    return out * undb(np.array([[2.5], [-2.5]]))


def plug():
    """The stone plug drops and bounces, ringing with the slab; a softer contact wakes mostly the lower modes."""
    # Each row: time in seconds, relative level in dB, corner in Hz above which the contact dulls the ring.
    bounces = [(6.822, -55, 9000), (6.839, -55, 12000), (6.947, -53.5, 3000), (6.957, -49.5, 2600)]
    # Ring of the plug on the slab. Each row: pitch in Hz, relative level in dB, seconds to fade by 60 dB.
    plug_modes = [(531, -6, 0.069), (724, -11, .09), (1135, -3, 0.095), (1950, 2, .06), (2190, 5, 0.063),
                  (3440, -5, 0.13), (5390, -1, 0.1), (6130, -2, 0.12), (7160, -11, .06)]
    t = np.arange(SR // 3) / SR
    out = np.zeros((2, N))
    for s, db, corner_hz in bounces:
        ring = 0
        for hz, g, t60 in plug_modes:
            softness = np.hypot(1, (hz / corner_hz) ** 2)
            ring = ring + undb(g) / softness * fading_tone(hz, t60, t)
        start = int(s * SR)
        out[:, start:start + len(t)] += undb(db) * ring * (1 - np.exp(-t / .003))
    return out


def wiping():
    """The palm rubs wet grit over the slab in short strokes; the hollow under it colours each one."""
    # Each row: middle in seconds, relative level in dB, length in seconds, pitch of the hollow in Hz.
    wipes = [(7.07, -69, .12, 900), (7.17, -73, .16, 3000), (7.215, -70, .08, 1280), (7.23, -72, .1, 600),
             (7.31, -72, .17, 1730), (7.515, -70, .09, 1230), (7.52, -74, .12, 1750)]
    # Hollow under the palm. Each row: multiple of its pitch, width as a share of its pitch, relative level in dB.
    palm = [(1, 0.13, 2), (2.3, 0.65, -22), (.6, .25, -5)]
    grit, out = grains(spread_db=3.0), 0
    for s, db, length, hz in wipes:
        hollow = resonances([(hz * ratio, hz * width, g) for ratio, width, g in palm])
        out = out + undb(db) * bump(s, length) ** 2 * colour(grit, hollow)
    return out * undb(-5.5 + 3.5 * walk(70))


def shallow_singing():
    """The bit sings while it bites into the flat slab at the second hole."""
    # Each row: pitch in Hz, width in Hz, relative level in dB.
    shallow_modes = [(4420, 75, 7), (1530, 80, -6), (3340, 140, -3)]
    ring = colour(grains(spread_db=4.0), resonances(shallow_modes))
    return undb(-31 + 1.3 * walk(25)) * stages()[2] * ring


def room(x, t60, wet_db):
    """Short diffuse tail from bench and walls."""
    t = np.arange(SR // 2) / SR
    tail = rng.standard_normal((2, len(t))) * np.exp(-np.log(1000) * t / t60) * (t > .004)
    tail = tail / np.sqrt(np.sum(tail[0] ** 2))
    return x + undb(wet_db) * signal.fftconvolve(x, tail, axes=1)[:, :N]


def scene():
    """Machine, small sounds with a room tail, and background."""
    small = room(handling() + knocks() + plug() + wiping(), t60=0.067, wet_db=-10)
    return grinder() + small + workshop()


def record(dry):
    """The phone rounds the tallest peaks and cuts the top of the treble."""
    ceiling, top_hz = .66, 15600  # tallest peak before the filter, as a share of full scale; treble limit
    rounded = dry / (1 + (dry / ceiling) ** 8) ** (1 / 8)
    return signal.sosfilt(signal.ellip(10, .2, 80, top_hz, fs=SR, output="sos"), rounded)


dry = scene()
out = record(dry)
generate_wav(out)
```